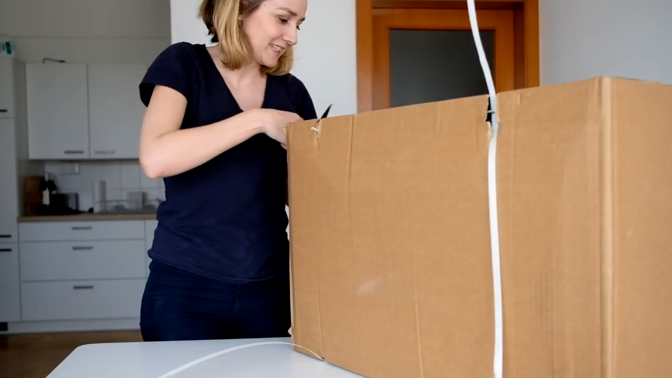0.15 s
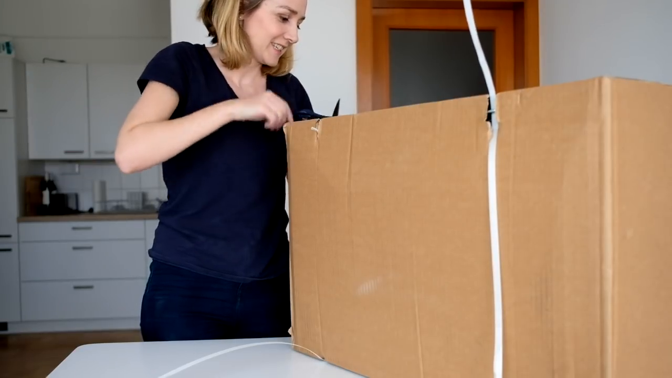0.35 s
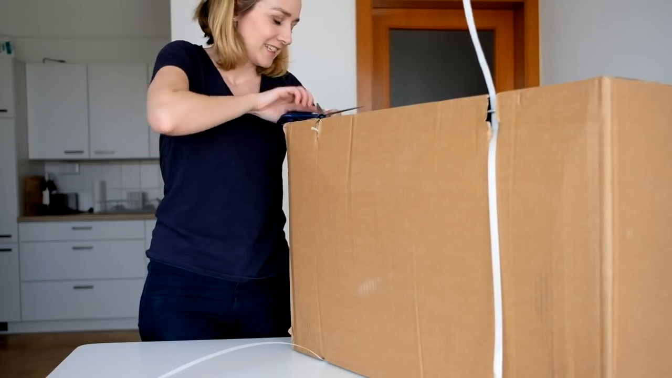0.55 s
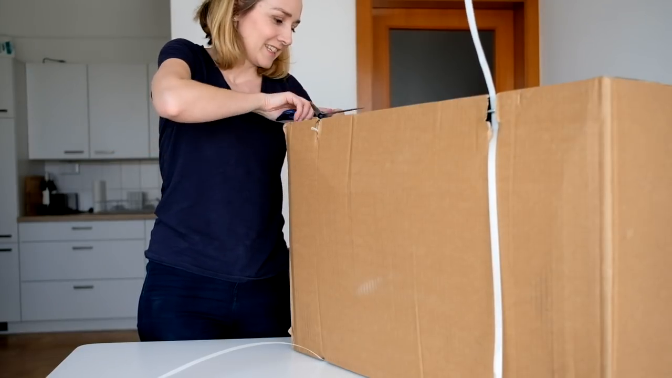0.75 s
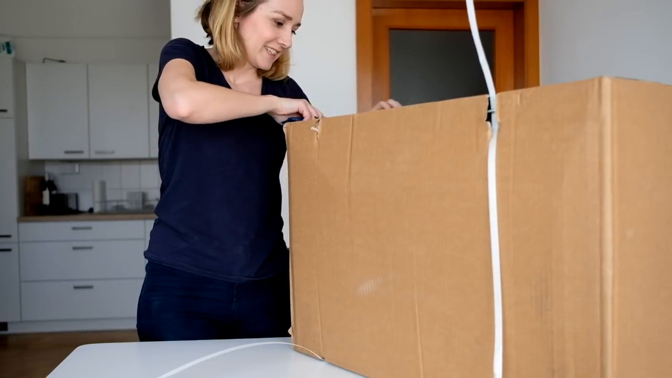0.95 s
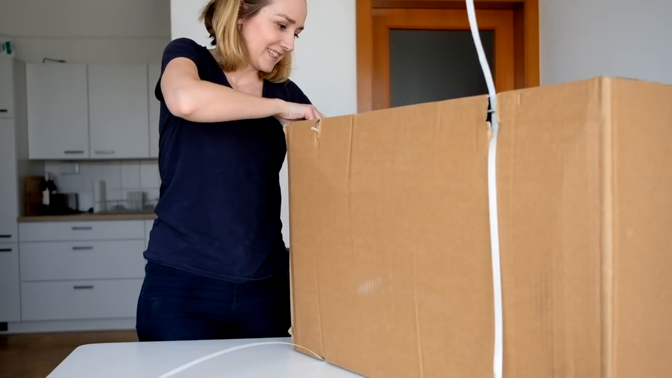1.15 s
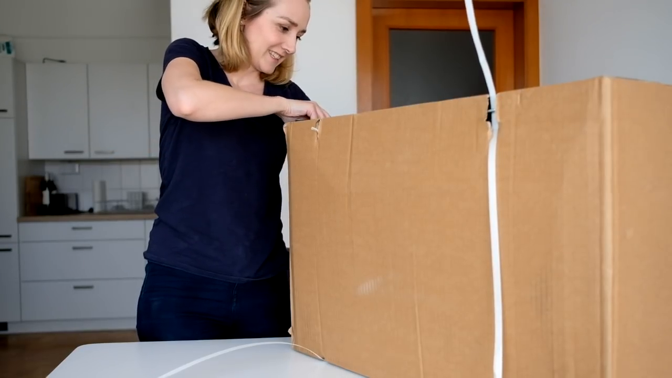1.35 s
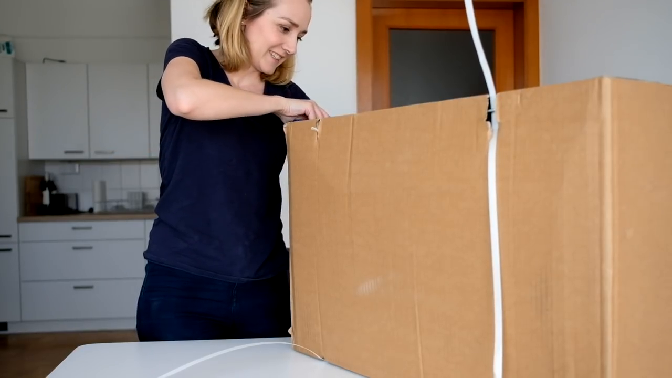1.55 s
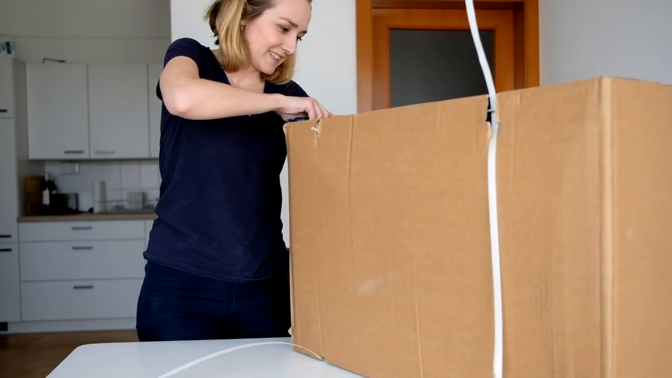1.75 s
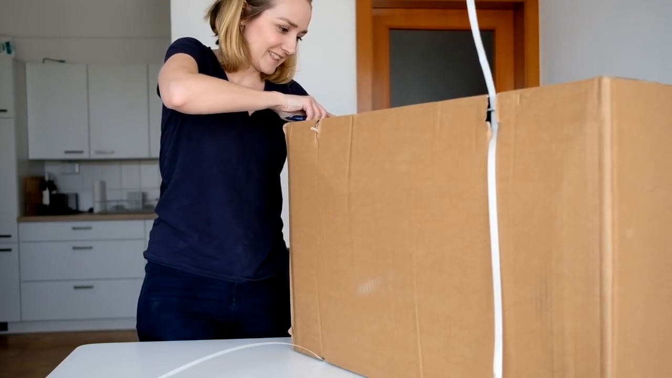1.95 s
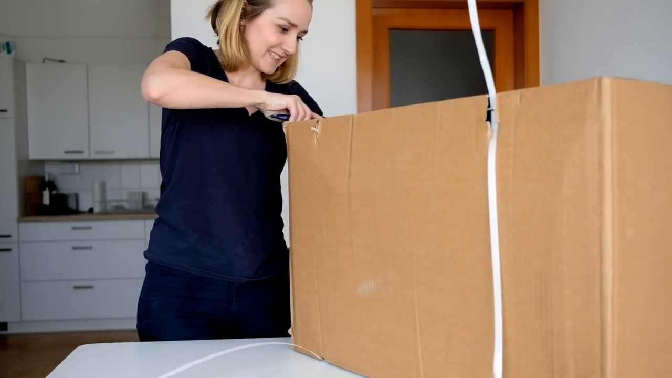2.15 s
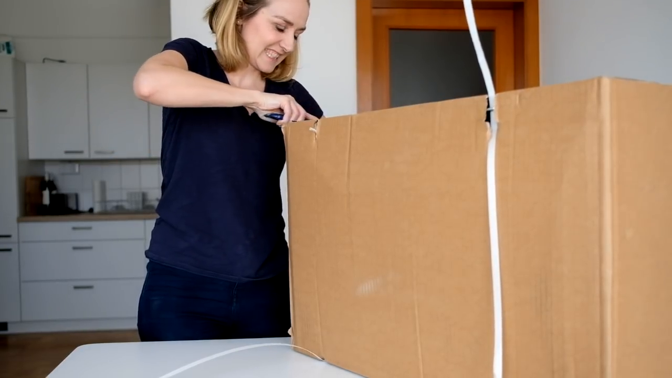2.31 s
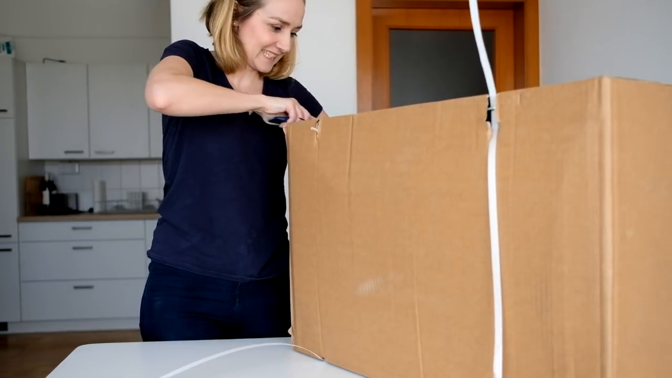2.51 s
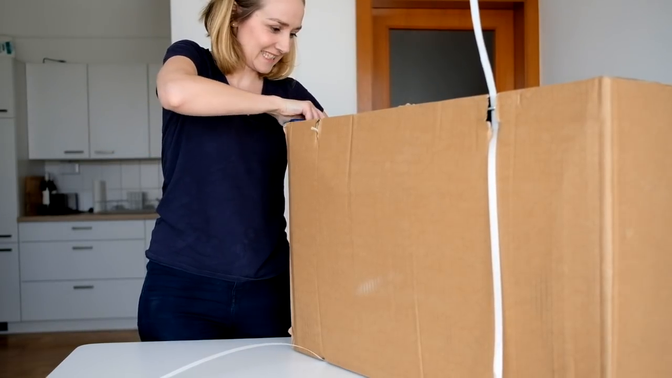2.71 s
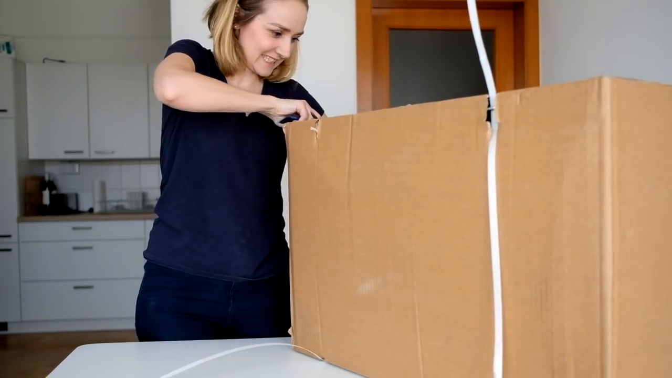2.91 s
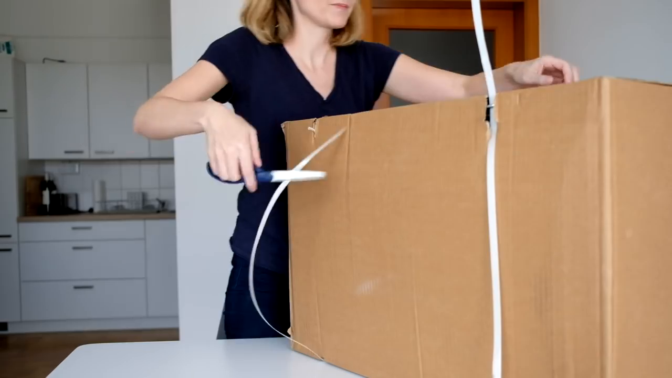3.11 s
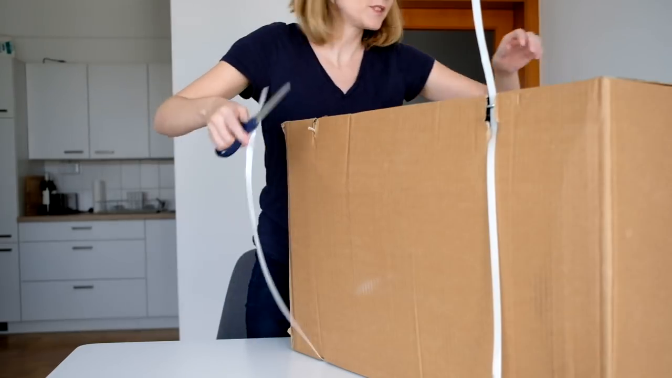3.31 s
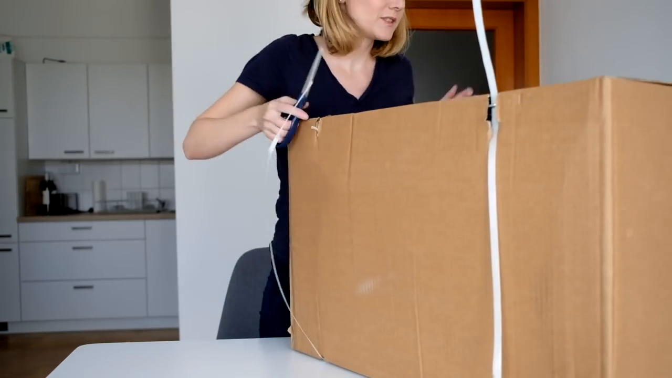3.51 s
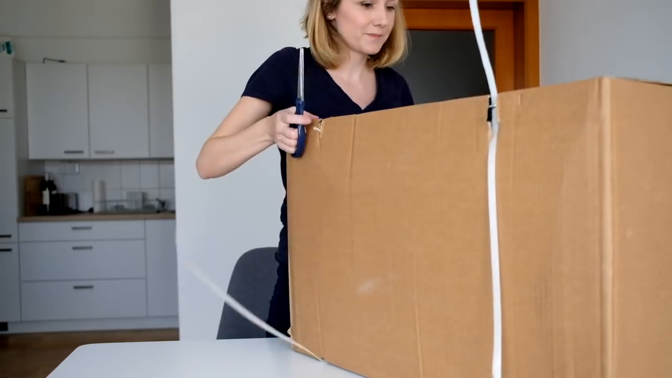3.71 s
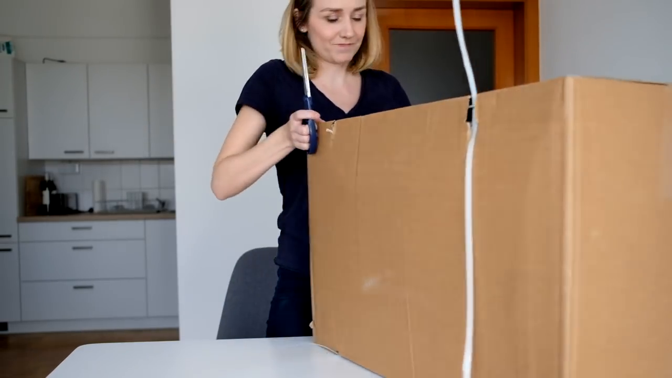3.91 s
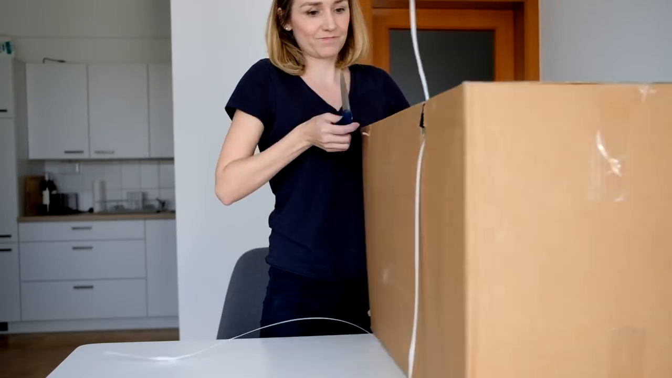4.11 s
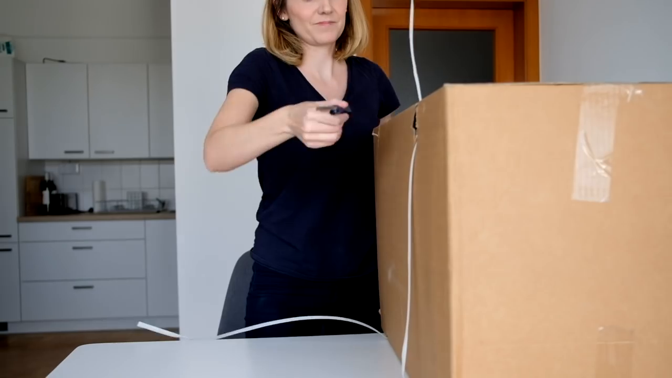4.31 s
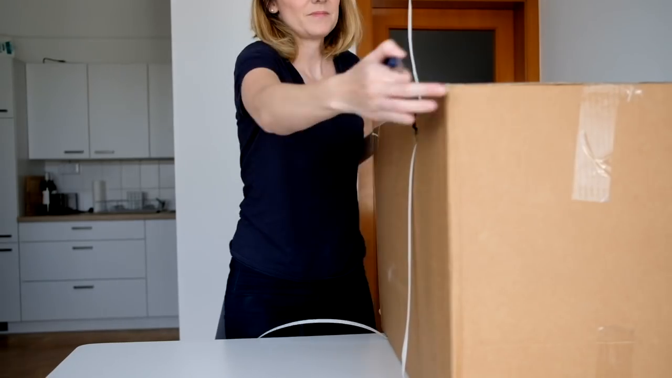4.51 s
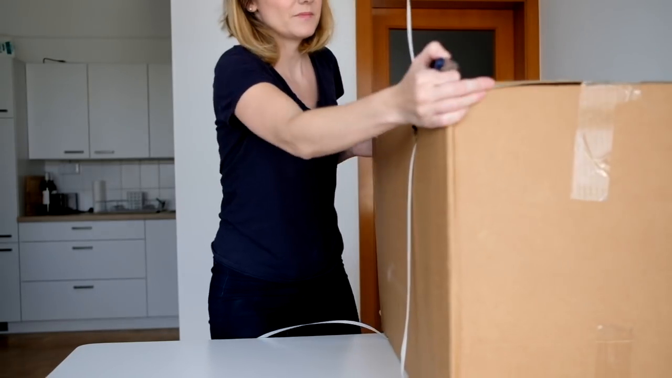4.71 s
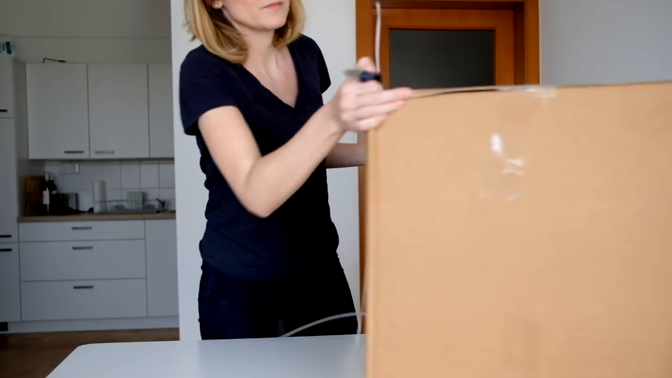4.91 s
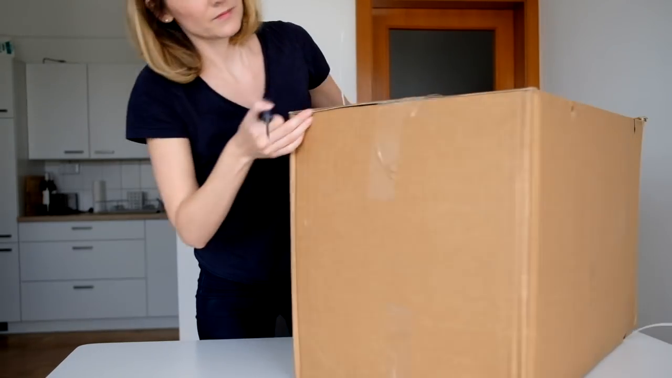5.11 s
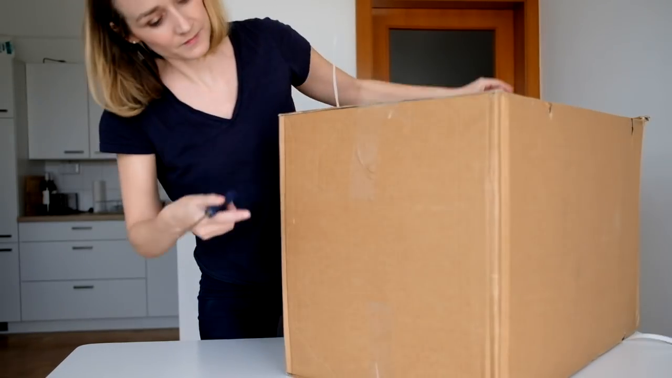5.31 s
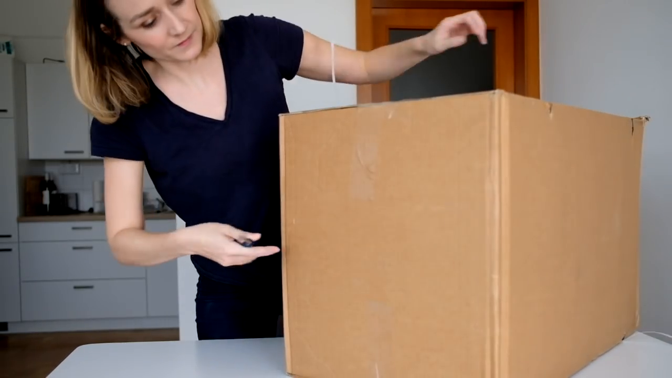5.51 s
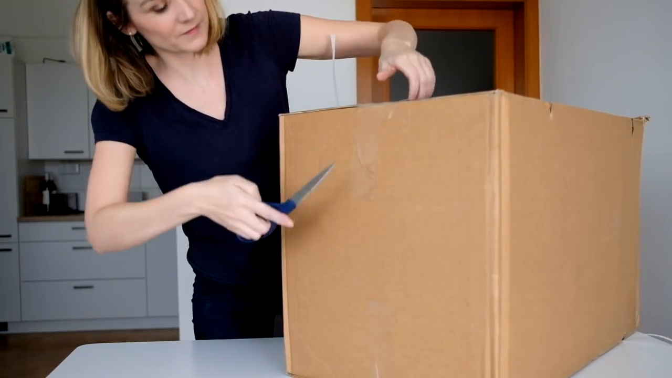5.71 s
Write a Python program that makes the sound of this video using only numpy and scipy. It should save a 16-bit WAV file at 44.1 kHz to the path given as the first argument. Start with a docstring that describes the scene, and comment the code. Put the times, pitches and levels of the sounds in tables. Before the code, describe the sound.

After a soft breathy hiss and faint blade clinks, tape is slit in jerky rasps, a strap slaps, and heavy cardboard scrapes and knocks.

```python
"""A soft, breathy hiss with steady resonances opens over a faint kitchen hum, and scissor blades clink.
Short strokes then slit the tape on a big cardboard box: stick-slip rasp, jerky tearing, cracks, drumming.
A loose plastic strap slaps down (decaying modes), then card scrapes as the box is turned in two shoves.
Hiss and friction are random impulse trains through coloured filters; walls and steel are decaying modes."""
import sys
import numpy as np
from scipy import signal
from scipy.fft import rfft, irfft
from scipy.io import wavfile
from scipy.ndimage import uniform_filter1d

SR = 44100
rng = np.random.default_rng(int(sys.argv[2]) if len(sys.argv) > 2 else 0)


def wav_out(sig):
    """Save sig, one row per channel (or a flat mono array), as 16-bit PCM at SR to the path in sys.argv[1]."""
    wavfile.write(sys.argv[1], SR, np.round(np.clip(np.atleast_2d(sig).T, -1, 1) * 32767).astype(np.int16))


N = 258073


def amp(db):
    """Decibels to gain."""
    return 10 ** (np.asarray(db) / 20)


def unit(x):
    """Scales to rms 1."""
    return x / np.sqrt(np.mean(x ** 2) + 1e-20)


def read(points, hz):
    """Interpolates a table on a log-frequency axis."""
    table_hz, value = np.transpose(points)
    return np.interp(np.log(hz + 1), np.log(table_hz), value)


def add(mix, start_s, sound):
    """Adds a sound into the mix at start_s."""
    part = mix[round(start_s * SR):][:len(sound)]
    part += sound[:len(part)]


def convolve(x, response):
    """Convolution cut to the length of x."""
    return signal.fftconvolve(x, response)[:len(x)]


def colour(x, points, tilt_db=0, size=2048):
    """Minimum-phase filter with the given spectrum and tilt per octave; keeps the power of white noise."""
    hz = abs(np.fft.fftfreq(size, 1 / SR))
    octaves = np.log2(np.maximum(hz, SR / size * 20))
    log_gain = np.log(amp(read(points, hz) + tilt_db * octaves))
    response = np.fft.ifft(np.exp(np.conj(signal.hilbert(log_gain)))).real
    return convolve(x, response / np.linalg.norm(response))


def ring(modes, size=16384):
    """Impulse response, of energy 1, of resonances given by their peak heights."""
    t = np.arange(size) / SR
    response = np.zeros(size)
    for hz, width_hz, db in modes:
        decay = np.exp(-np.pi * width_hz * t)
        response += amp(db) * width_hz * decay * np.sin(2 * np.pi * (hz * t + rng.random()))
    return response / np.linalg.norm(response)


def slips(per_s, spread_db):
    """A random train of tiny impulses of random sign and uneven size, as in stick-slip."""
    size = amp(spread_db * np.minimum(rng.exponential(1, N), 4))
    happens = rng.random(N) < per_s / SR
    return unit(size * rng.choice([-1, 1], N) * happens)


def waver(per_s):
    """Slow random drift of rms 1."""
    width = max(int(SR / per_s), 2)
    return unit(uniform_filter1d(uniform_filter1d(rng.standard_normal(N), width), width))


def steady(x, size=2600):
    """Holds the short-term power of a vibration at 1."""
    return x / np.sqrt(uniform_filter1d(x ** 2, size) + 1e-9)


def gains(strokes, rise_shape=1.4, release_shape=1.0):
    """Force builds, holds and lets go; returns the gain curves of rasp, treble and box shudder."""
    t, power = np.arange(N) / SR, np.zeros((3, N))
    for full_s, rise_s, hold_s, release_s, rasp_db, treble_db, shudder_db in strokes:
        before = np.maximum(full_s - t, 0) / rise_s
        after = np.maximum(t - full_s - hold_s, 0) / release_s
        force = np.exp(-np.minimum(before ** rise_shape + after ** release_shape, 20))
        power += (amp([[rasp_db], [rasp_db + treble_db], [rasp_db + shudder_db]]) * force) ** 2
    return np.sqrt(power)


def scrape(force, spectrum, per_s, spread_db, chatter_db, chatter_per_s, rasp_db, fizz_db, split_hz=5000):
    """Impulses whose level wavers at random; low rasp and high fizz follow separate gains."""
    clumps = slips(per_s, spread_db) * amp(chatter_db * waver(chatter_per_s))
    grit = colour(clumps, spectrum)
    low_pass = signal.butter(5, split_hz, "low", fs=SR, output="sos")
    high_pass = signal.butter(5, split_hz, "high", fs=SR, output="sos")
    rasp = unit(signal.sosfilt(low_pass, grit))
    fizz = unit(signal.sosfilt(high_pass, grit))
    return amp(rasp_db) * rasp * force[0] + amp(fizz_db) * fizz * force[1]


# still air spectrum: freq_hz, level_db (per Hz)
AIR_SPECTRUM = [(25, -16), (55, -8), (78, -13), (100, -4), (130, -7), (260, -1), (430, -8), (620, -4),
                (780, -12), (1000, -13.5), (2000, -15), (4000, -21), (8000, -28), (15500, -35)]
AIR_DB = -57
# appliance hum bands: freq_hz, width_hz, level_db
HUM_BANDS = [(56.2, 5.6, -58.5), (194, 12, -60.5)]


def room_tone():
    """Faint air noise and the wavering hum of kitchen appliances, as narrow bands of noise."""
    hz = np.fft.rfftfreq(N, 1 / SR)
    shapes = [(amp(read(AIR_SPECTRUM, hz)), AIR_DB)]
    for freq_hz, width_hz, db in HUM_BANDS:
        shapes.append((np.exp(-((hz - freq_hz) / width_hz) ** 2), db))
    return sum(amp(db) * unit(irfft(rfft(rng.standard_normal(N)) * shape, N)) for shape, db in shapes)


# thin appliance tone: time_s, level_db
WHINE_LEVEL = [(0, -59.5), (1.2, -60.5), (3.3, -63), (5.8, -65)]
WHINE_HZ = 543.5


def whine(drift=0.00061, drift_per_s=3.3):
    """A thin, nearly steady appliance tone that slowly fades."""
    level_db = np.interp(np.arange(N) / SR, *np.transpose(WHINE_LEVEL))
    pitch_hz = WHINE_HZ * (1 + drift * waver(drift_per_s))
    return amp(level_db) * unit(np.sin(2 * np.pi * np.cumsum(pitch_hz) / SR))


# room decay: freq_hz, t60_s
ROOM_DECAY = [(120, 0.68), (500, 1), (2000, 1), (6000, 0.55), (14000, 0.26)]


def kitchen(x, size=256):
    """Dense reflections off hard walls, each band dying at its own speed."""
    hz, t, z = signal.stft(rng.standard_normal(SR), SR, nperseg=size)
    decay = amp(-60 * t / read(ROOM_DECAY, hz)[:, None])
    tail = signal.istft(z * decay, SR, nperseg=size)[1]
    tail[:size] = 0  # gap before the first reflections
    return convolve(x, tail / np.linalg.norm(tail))


# difference between the microphone ports: freq_hz, level_db (against their sum)
PORT_DIFFERENCE = [(50, -22), (400, -24), (1000, -25), (2800, -21), (5500, -13.5), (8000, -4),
                   (11000, -2.5), (15500, -2)]


def ports(mid, scatter_decay_s=.045):
    """Two close ports agree in the bass; scattered treble reaches them differently."""
    t = np.arange(SR // 4) / SR
    scatter = rng.standard_normal(len(t)) * np.exp(-t / scatter_decay_s)
    side = rfft(convolve(mid, scatter / np.linalg.norm(scatter)))
    side = irfft(side * amp(read(PORT_DIFFERENCE, np.fft.rfftfreq(N, 1 / SR))), N)
    return np.array([mid + side, mid - side]) * amp([[.9], [-1.0]])  # channel balance, dB


# air space and wide panels of the box: freq_hz, width_hz, level_db
BOX_LOW_MODES = [(100, 12.4, -4.5), (141.3, 13.5, 0.5), (159, 26, -3), (202, 28, -1), (227.3, 34, -3),
                 (274, 31, 0.5)]
# flaps and narrow panels: freq_hz, width_hz, level_db
BOX_HIGH_MODES = [(309, 47, 0.5), (396, 44, 0.5), (511, 82, -2), (599, 70, -0.5), (683, 100, -5),
                  (814, 94, -8)]
LEAN_DB = -58.5  # faint shudder from the hand that leans on the box


def box_walls(handling, sliding, low_db=-2.5, high_db=-2, slide_low_db=-0.5, slide_high_db=1.5,
              lean_high_db=-5.5):
    """Random impulses keep the hollow box shuddering; sliding favours the narrow panels."""
    lean = np.ones(N)
    low_gain = np.linalg.norm(
        [amp(low_db) * handling, amp(slide_low_db) * sliding, amp(LEAN_DB) * lean], axis=0)
    high_gain = np.linalg.norm(
        [amp(high_db) * handling, amp(slide_high_db) * sliding, amp(LEAN_DB + lean_high_db) * lean], axis=0)
    low = convolve(slips(900, 0.41), ring(BOX_LOW_MODES))
    low = colour(low, [(50, -42.0), (75, -12), (95, 13.5), (300, -1.5), (700, -8)])
    high = convolve(slips(900, 3.14), ring(BOX_HIGH_MODES))
    high = colour(high, [(120, -32.5), (300, 3), (450, 2), (620, 3), (780, -4), (2000, -3.5)])
    return low_gain * steady(low) + high_gain * steady(high)


# blows on the box: start_s, peak_db, contact_s
BUMPS = [(0.194, -30, 0.00042), (1.426, -35.5, 0.00032), (1.959, -30, 0.00039), (2.142, -32, 0.00061),
         (2.2, -35, 0.00099), (2.286, -37, 0.00084), (2.45, -32, 0.00055), (3.573, -29.5, 0.00061),
         (3.799, -24.5, 0.0011), (3.823, -25, 0.00093), (4.479, -35.5, 0.000089), (4.684, -32, 0.0019),
         (4.708, -38, 0.00055)]


def thuds():
    """A push sets all walls ringing; a longer contact sounds duller."""
    out, t = np.zeros(N), np.arange(SR // 3) / SR
    walls = np.zeros(len(t))
    for k, (hz, width_hz, db) in enumerate(BOX_LOW_MODES + BOX_HIGH_MODES):
        walls += (-1) ** k * amp(db) * np.exp(-np.pi * width_hz * t) * np.sin(2 * np.pi * hz * t)
    for start_s, peak_db, contact_s in BUMPS:
        thud = convolve(walls, t * np.exp(-t / contact_s))
        add(out, start_s, amp(peak_db) * thud / abs(thud).max())
    return out


# hollow knocks of the box: start_s, level_db, pitch_hz, swell_s
KNOCKS = [(0.198, -35, 141.4, 0.013), (1.956, -40, 156, 0.012), (2.139, -27.5, 153, 0.007),
          (2.24, -28.5, 449, 0.0044), (2.297, -34, 177, 0.012), (3.803, -26, 170, 0.0036),
          (3.821, -23.5, 129, 0.0067), (3.846, -31, 230, 0.0019), (3.886, -32, 168, 0.0036),
          (4.713, -22.5, 241, 0.002), (4.728, -26.5, 341, 0.0035), (4.745, -26, 308, .004),
          (4.7728, -27, 337, 0.0026), (4.828, -31, 347, 0.0022)]


def knocks(overtone=2.3, overtone_db=-11):
    """A wall buckles or the bottom edge hops on the table: a hollow knock of a few cycles."""
    out, t = np.zeros(N), np.arange(SR // 6) / SR
    for start_s, db, hz, swell_s in KNOCKS:
        phase = 2 * np.pi * hz * t
        envelope = t / swell_s * np.exp(1 - t / swell_s)
        tone = np.sin(phase) + amp(overtone_db) * np.sin(overtone * phase)
        add(out, start_s, amp(db) * envelope * tone)
    return out


# friction locks onto one panel: start_s, length_s, pitch_hz, width_hz, level_db
GROANS = [(0.527, 0.13, 212, 91, -49), (0.795, 0.15, 183, 18, -51.5), (1.809, .014, 1400, 450, -37.5),
          (2.231, 0.047, 434, 250, -34), (4.725, 0.065, 336, 140, -37.5), (5.009, .08, 343, 120, -42.5)]


def groans():
    """Short juddering notes of the box walls: noise through one resonance twice."""
    out = np.zeros(N)
    for start_s, length_s, hz, width_hz, db in GROANS:
        count = int(length_s * SR)
        wall = ring([(hz, width_hz, 0)])
        note = convolve(convolve(rng.standard_normal(SR // 2), wall), wall)[-count:]
        add(out, start_s, amp(db) * unit(note) * signal.windows.tukey(count, .25))
    return out


# squeaks of the sliding card: start_s, length_s, first_hz, last_hz, level_db
SQUEAKS = [(3.765, 0.021, 2100, 1960, -35.5), (3.801, 0.015, 1886, 1790, -25.5),
           (3.85, 0.013, 1100, 1040, -30), (4.145, 0.018, 1714, 1654, -26.5),
           (5.199, 0.016, 1074, 970, -36)]


def squeaks(jitter=0.035, jitter_per_s=600, octave_db=-15):
    """The card sticks and slips regularly for an instant: a short, falling squeak."""
    out = np.zeros(N)
    for start_s, length_s, first_hz, last_hz, db in SQUEAKS:
        count = int(length_s * SR)
        pitch_hz = np.linspace(first_hz, last_hz, count) * (1 + jitter * waver(jitter_per_s)[:count])
        phase = 2 * np.pi * np.cumsum(pitch_hz) / SR
        tone = np.sin(phase) + amp(octave_db) * np.sin(2 * phase)
        add(out, start_s, amp(db) * signal.windows.tukey(count, .6) * tone)
    return out


def crackle(force, crackle_db=-6.5, per_s=24, spread_db=1.9, count=14):
    """Single fibres and flute edges give way under the rubbing: tiny pops at a range of pitches."""
    pops = np.zeros(N)
    for hz in np.geomspace(700, 6000, count):
        pops += convolve(slips(per_s, spread_db), ring([(hz, hz / 9, 0)], size=1024)) * hz ** -.35
    return amp(crackle_db) * force * unit(pops)


# spectrum of a release: freq_hz, level_db (per Hz)
SNAP_SPECTRUM = [(200, -12.5), (700, -11.5), (1100, -1), (1800, 1.5), (2600, 0.5), (3500, -1), (5000, -2.5),
                 (8000, -8.5), (15500, -15)]
# cardboard and tape catching and letting go: start_s, level_db, decay_s, tilt_db (per octave)
SNAPS = [(0.195, -42.5, 0.011, -2.5), (1.8104, -26.5, 0.005, -2.5), (1.818, -36, 0.036, -4),
         (1.157, -46.5, 0.0099, -8.5), (1.273, -48, 0.022, -11), (1.424, -46, 0.076, -6),
         (1.924, -43, .004, 0), (1.956, -39, 0.01, 3), (2.077, -39, .006, 0), (2.124, -35, .005, 4),
         (2.143, -26, 0.017, 0.5), (2.279, -30.5, 0.0087, 1), (2.42, -34, 0.0036, 3),
         (2.716, -46.5, .02, -1.5), (2.963, -34.5, 0.01, 1), (3.034, -24.5, 0.00092, -6.5),
         (3.045, -29.5, 0.0046, -1), (3.1436, -26.5, 0.0027, -2), (3.176, -32, 0.0016, -3.5),
         (3.528, -34, 0.0071, -6.5), (3.573, -31.5, 0.0069, -3), (3.676, -36.5, 0.017, 0),
         (3.7753, -28.5, 0.017, -4.5), (3.799, -25.5, 0.019, -3), (3.821, -25, 0.0079, -4.5),
         (3.844, -29, 0.013, -2.5), (3.979, -26.5, 0.0095, -3), (4.7086, -29, 0.0036, -2),
         (4.716, -24.5, 0.0027, -0.5), (4.778, -26.5, 0.0027, -0.5), (4.786, -19, 0.0013, 4),
         (4.878, -29, 0.0044, -6), (4.918, -27, 0.0047, -8.5), (4.934, -27, 0.0018, -3),
         (5.149, -30, 0.025, 1), (5.275, -32, 0.016, -2.5), (5.741, -43.5, 0.02, -3),
         (5.806, -41.5, 0.0093, 2.5)]


def snaps(rise_s=.0007):
    """Each release is a quickly dying burst of fibre cracks."""
    out, t = np.zeros(N), np.arange(SR // 4) / SR
    rise = 1 - np.exp(-t / rise_s)
    for start_s, db, decay_s, tilt_db in SNAPS:
        burst = rng.standard_normal(len(t)) * rise * np.exp(-t / decay_s)
        add(out, start_s, amp(db) * colour(burst, SNAP_SPECTRUM, tilt_db))
    return out


# strap's hollow knock: freq_hz, width_hz, level_db
STRAP_KNOCK = [(1270, 170, -0.5), (1490, 154, -10), (2620, 430, -4)]
# strap's bright tick: freq_hz, width_hz, level_db
STRAP_TICK = [(6500, 380, -0.5), (7260, 210, -7), (10470, 350, 4), (11000, 520, -1)]
# slaps and rebounds: start_s, knock_db, tick_db, knock_pitch (factor)
SLAPS = [(3.1158, -14.5, -54, 1.03), (3.1245, -33, -46, 1), (3.1984, -22, -44, 1.05),
         (3.2032, -22.5, -54, 1), (3.2514, -21.5, -25, 1.08), (3.2572, -46, -32, 1.05)]


def strap(rise_s=0.0008):
    """The loose strap clacks: a hollow knock whose pitch differs per slap, and a tick from its hard edge."""
    out, t = np.zeros(N), np.arange(SR // 10) / SR
    rise = 1 - np.exp(-t / rise_s)
    for start_s, knock_db, tick_db, knock_pitch in SLAPS:
        for modes, db, pitch in ((STRAP_KNOCK, knock_db, knock_pitch), (STRAP_TICK, tick_db, 1)):
            clack = np.zeros(len(t))
            for hz, width_hz, mode_db in modes:
                decay = np.exp(-np.pi * width_hz * t)
                clack += amp(mode_db) * decay * np.sin(2 * np.pi * hz * pitch * t)
            add(out, start_s, amp(db) * rise * clack)
    return out


# steel blades snipped shut: freq_hz, level_db, t60_s
BLADES = [(2000, -9, 0.045), (2700, 3, .025), (2760, -1, .06), (2850, 2, 0.069), (2890, 2, .025),
          (3570, -8, .03), (4190, -9, .05), (5200, -14, .02), (6170, -4, 0.013), (6950, -19, .015),
          (8600, 0, 0.011), (8730, -1, 0.025), (9250, -11, .012), (9870, -3, 0.0093), (10020, 0.5, .015),
          (10820, -13, .015), (12320, -9, .015)]
# blades standing open: freq_hz, level_db, t60_s
OPEN_BLADES = [(3830, -7, 0.033), (4300, 1, .06), (4420, -10, .05), (5140, -1, .02), (5640, 0, .045),
               (6600, -1, 0.0088), (8800, -6, .015), (10900, -15, .02)]
# blades pressed against the box edge: freq_hz, level_db, t60_s
PRESSED_BLADES = [(3125, -3, .07), (3420, 0, 0.023), (4400, -1, .012), (5400, -10, .015), (6150, -5, .015),
                  (6780, -2, .025), (7500, -8, .02), (10300, -14, .012)]
# blades meeting: start_s, ring_db, tick_db, chatter_decay_s, modes (one of the three above)
CLINKS = [(0.274, -36.5, -45, .007, PRESSED_BLADES), (0.634, -34.5, -43.5, 0.017, BLADES),
          (5.438, -40, -48, .018, OPEN_BLADES)]


def scissors(tick_decay_s=0.013, rise_s=0.0012, size=441):
    """A bright tick, then the blades chatter on each other and keep striking their own modes."""
    out, t = np.zeros(N), np.arange(SR // 2) / SR
    attack = 1 - np.exp(-t / rise_s)
    for start_s, ring_db, tick_db, chatter_s, modes in CLINKS:
        steel = np.zeros(len(t))
        for hz, db, t60_s in modes:
            contacts = rng.standard_normal(len(t)) * np.exp(-t / chatter_s)
            contacts[0] = np.linalg.norm(contacts)  # the first blow is as strong as all that follow
            mode = amp(-60 * t / t60_s) * np.sin(2 * np.pi * hz * t)
            steel += amp(db) * unit(convolve(contacts, mode))
        steel /= steel[:size].std()  # levelled on the first 10 ms
        tick = rng.standard_normal(len(t)) * np.exp(-t / tick_decay_s)
        tick = colour(tick, [(800, -12), (3000, -2), (6500, -3), (9500, -1), (15500, -10)])
        add(out, start_s, attack * (amp(ring_db) * steel + amp(tick_db) * tick))
    return out


def shifting(x, patch_db=1.9, size=512):
    """Random gains over time and frequency: the colour changes from moment to moment."""
    z = signal.stft(x, nperseg=size)[2]
    patches = uniform_filter1d(rng.standard_normal(z.shape), size=4, axis=0)
    patches = uniform_filter1d(patches, size=5, axis=1)
    moved = signal.istft(z * amp(patch_db * unit(patches)), nperseg=size)[1][:N]
    return unit(moved) * x.std()


# cardboard friction spectrum: freq_hz, level_db (per Hz)
CARD_SPECTRUM = [(300, -9.5), (450, 3.5), (620, -5.5), (900, 0), (1700, 2.5), (2600, 1), (4000, -2.5),
                 (6000, -10), (8000, -13), (11000, -16), (15500, -23)]
# pushes that shift the box on the table:
# full_s, rise_s, hold_s, release_s, rasp_db, treble_db (against rasp), shudder_db (against rasp)
PUSHES = [(3.17, 0.016, 0.088, 0.25, -49.5, -6, -5), (3.458, 0.005, 0.11, 0.027, -47, -7.5, -5),
          (3.58, 0.035, 0.12, 0.085, -42, -3.5, 0.5), (3.785, 0.022, 0.042, 0.093, -34, -14, -2.5),
          (4.49, 0.015, 0.21, 0.057, -54.5, -13, 6), (4.716, 0.017, 0.047, 0.083, -43.5, -5, 3.5),
          (5.5, 0.23, 0.3, 0.069, -54.5, -7, -2), (5.812, 0.011, 0.024, .05, -46, -9.5, 0.5)]
# long slides as the box swings round:
# full_s, rise_s, hold_s, release_s, rasp_db, treble_db (against rasp), shudder_db (against rasp)
SLIDES = [(4.02, 0.19, 0.15, 0.12, -36, 0.67, -12), (4.95, 0.18, 0.24, 0.13, -36, -1.3, -11.5)]


def shoves(push, slide):
    """Dense slips of card on the table as the box is pushed and swung round."""
    return scrape(np.hypot(push, slide), CARD_SPECTRUM, per_s=7000, spread_db=1.5,
                  chatter_db=0.25, chatter_per_s=29, rasp_db=-0.63, fizz_db=0.5)


# noise spectrum shared by hiss, cuts and tearing: freq_hz, level_db (per Hz)
TAPE_SPECTRUM = [(300, -19.5), (450, -4), (620, 2), (900, 4.5), (1600, 2), (2600, 2), (4000, -1.5),
                 (6000, -5), (8000, -8), (11000, -13), (15500, -25.5)]
# swells of the breathy hiss:
# full_s, rise_s, hold_s, release_s, rasp_db, treble_db (against rasp), shudder_db (against rasp)
BREATH_STROKES = [(0.0, .02, 0.025, 0.071, -49.5, -10, -0.5), (0.125, 0.043, 0.068, .03, -51, 0, -2),
                  (0.2, 0.014, 0.057, 0.034, -49, -3.5, 9), (0.285, 0.018, 0.025, 0.11, -46.5, -2, -20),
                  (0.42, 0.047, 0.098, 0.18, -51, -19, -2)]
# resonances in the hiss: freq_hz, width_hz, level_db
BREATH_RESONANCES = [(1550, 41, 6.5), (2034, 75, 7.5), (2570, 130, 2.5), (2710, 160, 0.5), (3170, 86, -2),
                     (3420, 360, -4), (4600, 570, -4), (5300, 290, -5.5), (6840, 200, -12),
                     (7400, 300, -8.5), (10200, 250, -20)]


def breathy_hiss(force, resonance_db=-2, drift=.012, drift_per_s=5):
    """A soft, breathy hiss: dense noise plus resonances that hold their pitch but for a slight drift."""
    hiss = scrape(force, TAPE_SPECTRUM, per_s=9700, spread_db=4.5, chatter_db=1.5, chatter_per_s=59,
                  rasp_db=-1.5, fizz_db=-7)
    drive = slips(7300, 1.5)
    resonant = np.zeros(N)
    for hz, width_hz, db in BREATH_RESONANCES:
        resonant += amp(db) * np.sqrt(width_hz) * convolve(drive, ring([(hz, width_hz, 0)]))
    read_at = np.cumsum(1 + drift * waver(drift_per_s))
    resonant = np.interp(read_at, np.arange(N), resonant)
    return hiss + amp(resonance_db) * force[0] * unit(resonant)


# flaps held taut by the tape: freq_hz, width_hz, level_db
TAPED_FLAPS = [(498, 85, -1), (650, 62, -7.5)]


def tearing(force, tear_db=-6.5, per_s=130, spread_db=1.3, burst_s=.0012, wall_db=-7):
    """The tape gives way in little jerks, each a tight burst of cracks that also plucks the flaps."""
    t = np.arange(SR // 50) / SR
    envelope = convolve(abs(slips(per_s, spread_db)), np.exp(-t / burst_s))
    bursts = envelope * rng.standard_normal(N)
    tear = unit(colour(bursts, TAPE_SPECTRUM))
    flaps = unit(convolve(bursts, ring(TAPED_FLAPS)))
    return force * (amp(tear_db) * tear + amp(wall_db) * flaps)


# blade strokes over and through the tape:
# full_s, rise_s, hold_s, release_s, rasp_db, treble_db (against rasp), shudder_db (against rasp)
STROKES = [(1.27, 0.066, 0.12, .03, -60.5, -3, 4), (1.44, 0.02, 0.016, .05, -55, 2.5, 8),
           (1.56, .04, 0.078, 0.15, -58, -7, 4.5), (1.785, 0.026, 0.023, .01, -51, -8, -4),
           (1.815, 0.0074, 0.1, .02, -50, 0, -2), (1.962, 0.03, 0.0092, 0.071, -45, -1.5, 3),
           (2.085, 0.036, 0.059, .02, -43.5, -3, 2.5), (2.145, 0.022, 0.16, 0.054, -37.5, -2, 2),
           (2.44, 0.03, 0.024, 0.067, -36, -4, -4), (2.6, 0.14, 0.15, 0.051, -51.5, -7.5, -2.5),
           (2.965, 0.081, 0.059, 0.016, -42, -4, -5), (3.04, 0.0076, 0.0692, 0.0023, -38.5, -5.5, -3)]


def cuts(force):
    """The blade rasps over the tape, slipping in clumps across fibres, while the tape tears."""
    rasp = scrape(force, TAPE_SPECTRUM, per_s=4000, spread_db=-2.0, chatter_db=0.7, chatter_per_s=93,
                  rasp_db=-1.5, fizz_db=-1)
    return rasp + tearing(force[0])


def scene():
    """All sources, each with its share of the room."""
    breath, cut, push = gains(BREATH_STROKES), gains(STROKES), gains(PUSHES)
    slide = gains(SLIDES, rise_shape=1.3, release_shape=1.51)
    shudder = box_walls(np.linalg.norm([breath[2], cut[2], push[2]], axis=0), slide[2])
    walls = shudder + groans() + thuds() + knocks()
    textures = shifting(breathy_hiss(breath) + cuts(cut) + shoves(push, slide))
    textures += crackle(np.linalg.norm([cut[0], push[0], slide[0]], axis=0)) + squeaks()
    cracks, steel, clacks = snaps(), scissors(), strap()
    to_room = amp(-10.5) * textures + amp(-10) * walls + amp(-4.0) * cracks
    to_room += amp(-3) * steel + amp(-13.5) * clacks
    direct = textures + walls + cracks + steel + clacks
    return ports(direct + kitchen(to_room) + room_tone() + whine())


def record(dry, edge_hz=15900):
    """Steep linear-phase low-pass: the upper band limit."""
    low_pass = signal.firwin(511, edge_hz, window=("kaiser", 9), fs=SR)
    return signal.oaconvolve(dry, low_pass[None], "same")


dry = scene()
out = record(dry)
wav_out(out)
```